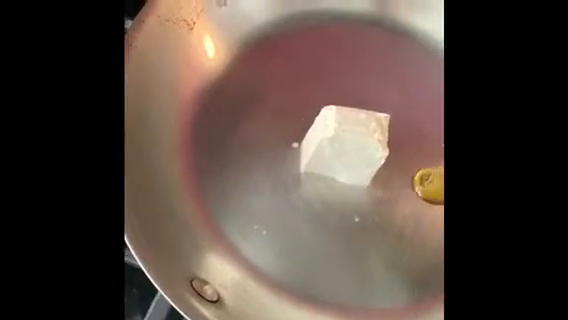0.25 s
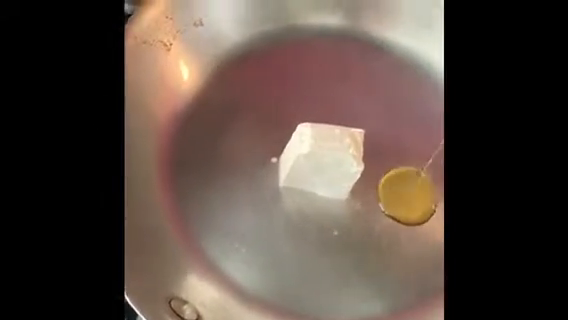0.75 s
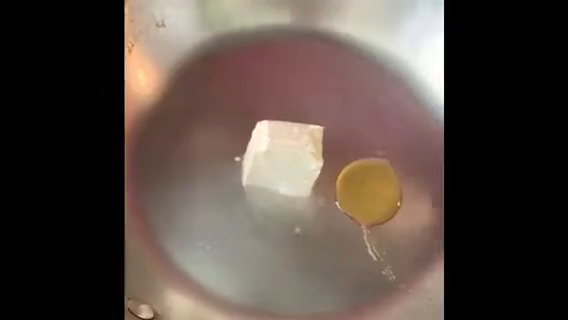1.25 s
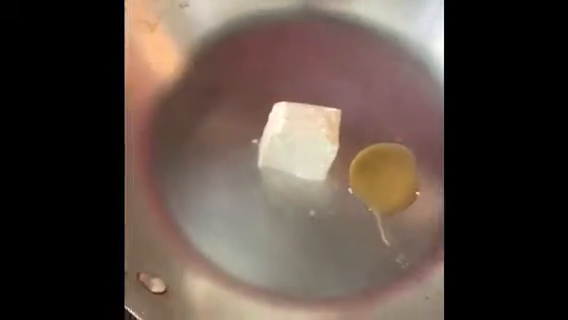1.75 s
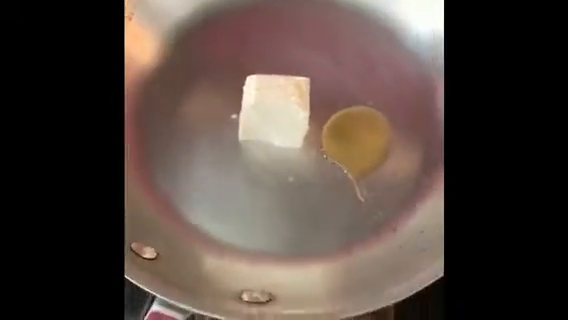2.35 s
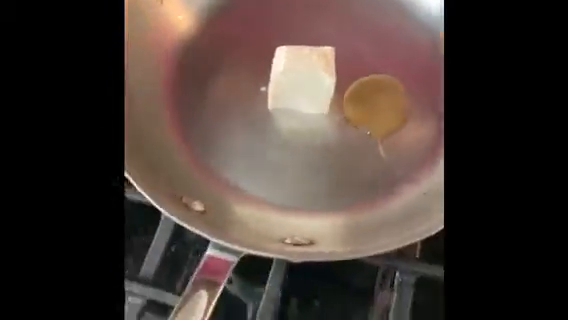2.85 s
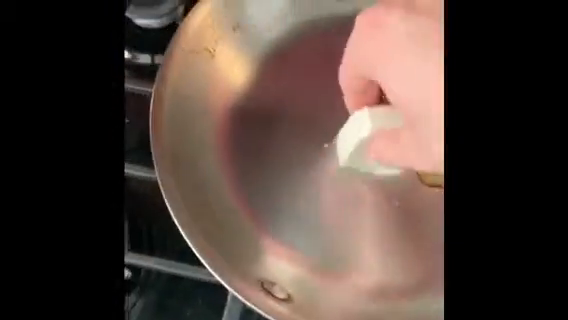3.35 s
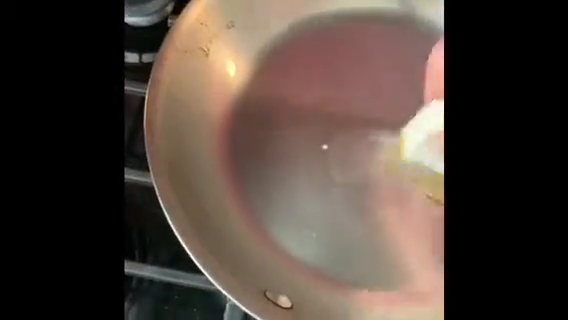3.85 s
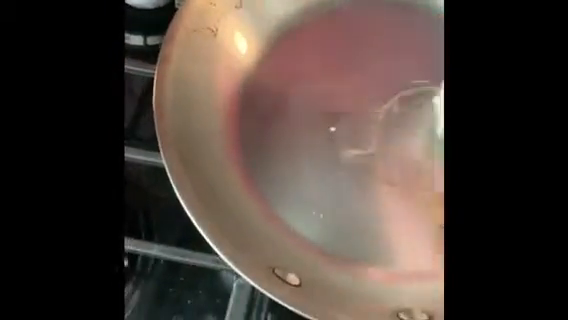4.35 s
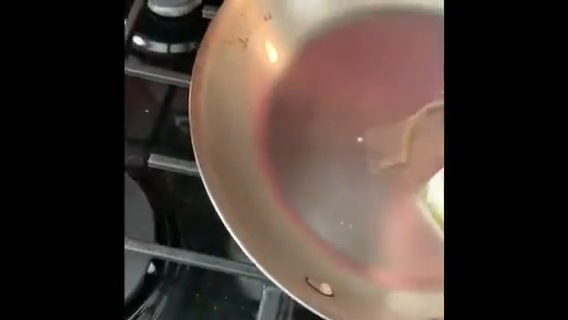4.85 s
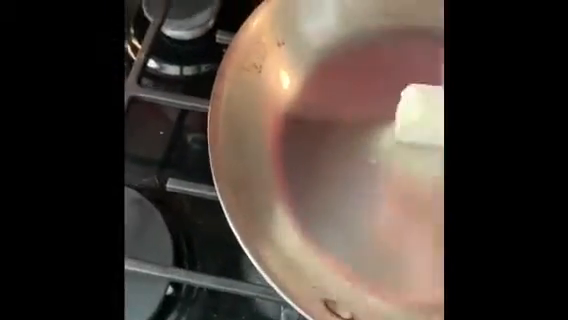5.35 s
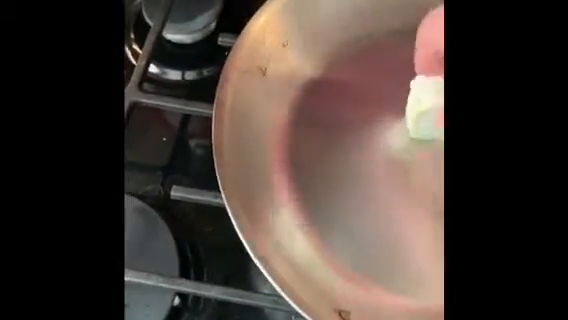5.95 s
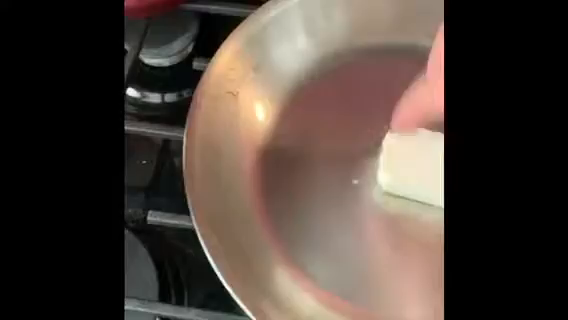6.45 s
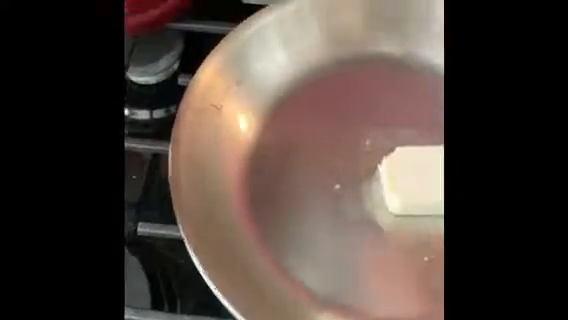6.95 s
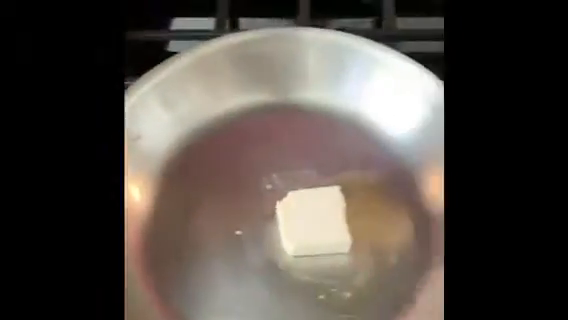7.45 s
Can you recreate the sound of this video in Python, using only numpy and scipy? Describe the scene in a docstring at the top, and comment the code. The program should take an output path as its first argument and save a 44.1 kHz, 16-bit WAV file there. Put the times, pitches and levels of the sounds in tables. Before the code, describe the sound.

A small hard-walled kitchen, heard closely in stereo. Throughout, a gas burner makes a quiet low rumble, airy hiss and thin wavering whines near 3, 5 and 7 kHz that slowly sag and fade. At 0.66 s an oil bottle gulps: a tiny pop and quick falling bubbles, then a very faint rising chirp. At 2.12 s the bottle lands on the counter, the loudest event: sharp woody knocks with a short high glass squeak, a second cluster at 2.26-2.31, and weak taps at 2.4 and 2.58. Soft hand rustles swell around 2.7-3.0. A tiny snap comes at 3.49. Dull pan-on-iron clacks at 3.82-3.95 precede a bright steel clink at 4.46, ringing briefly. Faint rocking follows at 4.65-5.02, small snaps near 5.2, then a fuller, quieter clink at 6.21 with clacks until 6.43. A faint rustle passes at 7.3; dry clicks and hollow bumps rush in from 7.58 to 7.7.

```python
"""A small kitchen: a gas burner rumbles, hisses and whines under a steel frying pan; hard walls echo the blows.
Noise shaped by the burner tube makes the hiss; slowly wavering narrow-band noise makes the whines.
An oil bottle gulps (falling tone bursts, rising chirp), then lands on the counter, squeaks and rings.
A hand rustles (noise swells) and butter snaps; the pan clinks and rocks on its grate; something heavy bumps.
Blows are decaying sines plus dense noise bursts and wavefronts, low-passed by the softness of the contact."""
import sys
import numpy as np
from scipy import signal
from scipy.fft import rfft, irfft, next_fast_len
from scipy.io import wavfile

SR = 44100
rng = np.random.default_rng(int(sys.argv[2]) if len(sys.argv) > 2 else 0)


def dump_mix(stems):
    """Bounce the given channels to the path in sys.argv[1] as a 16-bit WAV at rate SR."""
    frames = np.atleast_2d(stems).T  # one column per channel
    limited = np.clip(frames, -1, 1)  # hard clip at full scale
    pcm = np.round(limited * 32767).astype(np.int16)
    wavfile.write(sys.argv[1], SR, pcm)


N = 340055
T = np.arange(N) / SR
RING_T = T[:SR]
TOP_HZ = 15900  # upper band limit


def undb(db):
    """Decibels to amplitude ratio."""
    return 10 ** (np.asarray(db) / 20)


def at_hz(points, hz):
    """Read (hz, value) points on a log-frequency axis."""
    f, value = np.transpose(points)
    return np.interp(np.log(hz + 1), np.log(f), value)


def bins(size):
    """Frequencies of the real spectrum, in Hz."""
    return np.fft.rfftfreq(size, 1 / SR)


def colour(x, points):
    """Shape a spectrum by (hz, gain_db) points."""
    size = x.shape[-1]
    return irfft(rfft(x) * undb(at_hz(points, bins(size))), size)


def unit(x):
    """Scale to rms 1."""
    return x / np.sqrt(np.mean(x ** 2))


def unit_attack(x):
    """Scale to rms 1 over the first 20 ms."""
    return x / np.sqrt(np.mean(x[..., :SR // 50] ** 2))


def fade(t60_s):
    """Exponential decay by 60 dB in t60_s."""
    return np.exp(-np.log(1000) * RING_T / np.maximum(t60_s, 1e-3))


def envelope(start_s, attack_s, hold_s, t60_s):
    """Linear rise, hold, exponential decay."""
    age_s = T - start_s
    rise = np.clip(age_s / attack_s, 0, 1)
    decay_db = -60 * np.clip((age_s - attack_s - hold_s) / t60_s, 0, 3)
    return rise * undb(decay_db)


def tone(start_s, pitch_hz, rise_hz_per_s=0):
    """Sine whose pitch moves at a steady rate from pitch_hz at start_s."""
    age_s = T - start_s
    return np.sin(2 * np.pi * (pitch_hz + rise_hz_per_s * age_s / 2) * age_s)


def wander(per_s):
    """Slow chance: normal random values, per_s of them a second, joined by straight lines."""
    return np.interp(T * per_s, np.arange(SR), rng.standard_normal(SR))


# left-right correlation of diffuse sound: hz, correlation
DIFFUSE_CORRELATION = [(100, 0.94), (400, 0.84), (900, 0.31), (1600, 0.041), (5000, 0.088)]


def diffuse(size):
    """Stereo noise, alike in the bass and nearly unrelated in the treble."""
    likeness = np.clip(at_hz(DIFFUSE_CORRELATION, bins(size)), 0, 1)
    noise = rng.standard_normal((2, size))
    mid, side = rfft(noise) * np.sqrt([1 + likeness, 1 - likeness])
    return unit(irfft([mid + side, mid - side], size))


def convolve(x, response):
    """Filter by a response, cut to N samples."""
    return signal.fftconvolve(np.atleast_2d(x), np.atleast_2d(response), axes=-1)[:, :N]


def die_away(x, t60_points):
    """Let each frequency region fade at its own (hz, t60_s) rate."""
    spectrum, out = rfft(x), 0
    for band_hz, t60_s in t60_points:
        share = at_hz([(f, f == band_hz) for f, _ in t60_points], bins(SR))
        out = out + irfft(spectrum * share) * fade(t60_s)
    return out


def ring(modes, spread=0.65):
    """Decaying sines: neighbours in opposite phase, high modes out of step between the ears."""
    out = 0
    for k, (hz, db, t60_s) in enumerate(modes):
        skew = spread * rng.standard_normal() * min(hz / 1500, 2) * np.array([[1], [-1]])
        mode = np.sin(2 * np.pi * hz * RING_T + skew) * fade(t60_s)
        out = out + (-1) ** k * undb(db) * mode
    soft_onset = 1 - fade(0.0045)
    return unit_attack(out * soft_onset)


def crack(points, travel_ms=0):
    """Causal first wavefront; bending waves delay it by travel_ms at 1 kHz, treble less, bass more."""
    hz = bins(SR)
    # fold the cepstrum: minimum phase
    cepstrum = irfft(at_hz(points, hz) * np.log(10) / 20)
    cepstrum[1:SR // 2] *= 2
    cepstrum[SR // 2:] = 0
    bending_rad = 4 * np.pi * abs(travel_ms) * np.sqrt(hz / 1000)
    return unit_attack(irfft(np.exp(rfft(cepstrum) - 1j * bending_rad)) * fade(0.8))


# decay of small overtones: hz, t60_s
OVERTONE_DECAY = [(2500, 0.15), (6000, 0.18), (12000, 0.18)]


def body(points, t60_s, overtones_db=-6):
    """Countless small modes: a dense noise burst plus sparse random overtones that ring on."""
    hz = bins(SR)
    scattered = (rng.random(len(hz)) < 1 / 55) & (hz > 1100)
    overtones = die_away(unit(irfft(rfft(diffuse(SR)) * scattered)), OVERTONE_DECAY)
    burst = diffuse(SR) * fade(t60_s) + undb(overtones_db) * overtones
    return unit_attack(convolve(burst, crack(points))[:, :SR])


def strike(response, start_s, level_db, bright_hz):
    """One blow; two low-pass poles at bright_hz: a softer contact pushes longer, exciting less treble."""
    relax = np.exp(-2 * np.pi * bright_hz / SR)
    hit = signal.lfilter([(1 - relax) ** 2], [1, -2 * relax, relax ** 2], response) * undb(level_db)
    return np.pad(hit, ((0, 0), (int(start_s * SR), N)))[:, :N]


# contact to contact: mode level spread, pitch spread as a share
SPOT_SCATTER_DB, LOAD_DETUNE = 3.5, .002


def new_spot(modes, ring_share):
    """Each contact loads the board anew: modes change level, shift slightly, keep ring_share of t60."""
    chance = rng.standard_normal((len(modes), 2))
    return [(hz * (1 + LOAD_DETUNE * a), db + SPOT_SCATTER_DB * b, t60_s * ring_share)
            for (hz, db, t60_s), (a, b) in zip(modes, chance)]


def place(x, side):
    """Direction: a level difference between the ears, by frequency."""
    size = next_fast_len(N + SR, real=True)
    tilt = undb(at_hz(side, bins(size)) / 2)
    return irfft(rfft(x, size) * [tilt, 1 / tilt], size)[:, :N]


# wall reflections: hz, t60_s
KITCHEN_DECAY = [(100, 0.66), (500, 0.52), (1500, 0.51), (4000, 0.28), (8000, 0.57), (15000, 0.2)]


def kitchen(build_s):
    """Room response of unit energy: noise that builds up quickly, then decays by frequency."""
    tail = die_away(diffuse(SR), KITCHEN_DECAY) * (1 - np.exp(-(RING_T / build_s) ** 2))
    return unit(tail) / np.sqrt(SR)


# flame spectrum, relative: hz, level_db
FLAME_COLOUR = [(20, -10.5), (45, -6), (70, 2), (125, -3.5), (180, -8), (400, -14.5), (620, -12),
                (850, -18.5), (1100, -27.5), (1500, -38), (4000, -68.5)]
# gas hiss spectrum before the tube, relative: hz, level_db
JET_COLOUR = [(300, -5.5), (1400, -1.5), (2400, 6), (4000, -3.5), (6200, -5), (11000, 1.5), (15500, -1.5)]
# burner tube resonances: centre_hz, width_hz, gain_db
TUBE_MODES = [(3000, 990, 8.5), (5027, 820, 9), (7190, 480, 3), (11750, 1800, 4)]
# whines at time 0: pitch_hz, level_db
BURNER_WHINES = [(3060, -72.5), (5100, -82.5), (7300, -79.5)]
JET_DB, JET_WANDER_DB, JET_WANDER_PER_S = -72, 1.6, 1.5
WHINE_WIDTH_HZ, WHINE_WAVER_HZ, WHINE_SAG_HZ_PER_S, WHINE_FADE_DB_PER_S = 240, 50, 25, 0.97


def burner():
    """Low flame noise, gas hiss through a resonant tube, and thin wavering whines that sag and fade."""
    flame = unit(colour(diffuse(N), FLAME_COLOUR)) * undb(-59.0)
    hz = bins(N)
    tube_db = sum(db / (1 + (2 * (hz - f) / width_hz) ** 2) for f, width_hz, db in TUBE_MODES)
    jet = irfft(rfft(colour(diffuse(N), JET_COLOUR)) * undb(tube_db), N)
    out = flame + unit(jet) * undb(JET_DB + JET_WANDER_DB * wander(JET_WANDER_PER_S))
    flutter = unit(irfft(rfft(diffuse(N)) / (1 + (2 * hz / WHINE_WIDTH_HZ) ** 2), N))
    for start_hz, db in BURNER_WHINES:
        whine_hz = start_hz - WHINE_SAG_HZ_PER_S * T + WHINE_WAVER_HZ * wander(per_s=8.9)
        swell_db = db - WHINE_FADE_DB_PER_S * T + JET_WANDER_DB * wander(JET_WANDER_PER_S)
        carrier = np.sin(2 * np.pi * np.cumsum(whine_hz) / SR)
        own_flutter = np.roll(flutter, rng.integers(N), axis=1)
        out = out + own_flutter * carrier * undb(swell_db)
    return out


# sheet-metal stove top, relative: hz, level_db
STOVE_COLOUR = [(50, -0.5), (110, 4), (220, -12), (340, 2), (500, -29), (750, -0.5), (1200, -54)]
BOOM_RISE_S, BOOM_T60_S = 0.013, 1
BOOM_ROCK_DB, BOOM_CLINK_DB = 1.5, -22.5  # added to the level of the blow that shakes it


def stove_top():
    """Blows on the pan pass down through the grate; the sheet metal answers with a slow-rising low boom."""
    boom = unit(colour(diffuse(SR), STOVE_COLOUR))
    boom = boom * (1 - np.exp(-RING_T / BOOM_RISE_S)) * fade(BOOM_T60_S)
    rocked = sum(strike(boom, s, db + BOOM_ROCK_DB, hz) for s, db, hz in PAN_ROCKS)
    clinked = sum(strike(boom, s, db + BOOM_CLINK_DB, hz) for s, db, hz, _ in PAN_CLINKS)
    return rocked + clinked


# hand reaching in and drawing back: peak_s, level_db, rise_s
HAND_SWELLS = [(2.715, -57.5, 0.068), (2.839, -55.5, 0.036), (2.97, -55.5, 0.067), (7.32, -58, 0.15)]
# rustle spectrum, relative: hz, level_db
HAND_COLOUR = [(100, 8.5), (350, 15), (900, -2), (2400, 1), (3800, -8.5), (5200, -5.5), (8000, -21),
               (16000, -22)]
# butter snaps in the oil, then dry clicks: start_s, level_db, centre_hz
BUTTER_TICKS = [(3.487, -54.5, 7000), (5.212, -57, 13200), (5.2309, -51, 13100), (7.5787, -55, 3730),
                (7.604, -40.5, 2800), (7.609, -41, 2600)]
HAND_FALL_RATIO = 1.73  # fall time / rise time


def butter():
    """The hand's rustle, noise that swells and falls with each move, plus short band-noise ticks."""
    power = 0
    for s, db, rise_s in HAND_SWELLS:
        width_s = np.where(T < s, rise_s, rise_s * HAND_FALL_RATIO)
        power = power + (undb(db) * np.exp(-abs(T - s) / width_s)) ** 2
    out = unit(colour(diffuse(N), HAND_COLOUR)) * np.sqrt(power)
    for s, db, hz in BUTTER_TICKS:
        snap = colour(diffuse(SR), [(hz / 3, -20), (hz / 1.1, 0), (1.3 * hz, -2), (1.4 * hz, -24)])
        out = out + strike(unit(snap) * fade(0.035), s, db, TOP_HZ)
    return out


# something heavy shifted along the worktop: start_s, level_db, bright_hz
WORKTOP_BUMPS = [(7.581, -58, 902), (7.610, -51.5, 2500), (7.6238, -45.5, 683), (7.6525, -47, 2300),
                 (7.663, -42, 1810), (7.678, -42, 900), (7.686, -41.5, 1820), (7.6951, -39, 1500),
                 (7.704, -41.5, 900)]
# its main modes, t60 before ring_share: hz, level_db, t60_s
WORKTOP_BUMP_MODES = [(94, -4, 0.22), (224, -7, 0.26), (353, 0.5, 0.14), (682, 7.5, 0.2),
                      (1044, 12.5, 0.11), (1345, 5, 0.12), (1603, 7.5, 0.044), (2830, 0, .08),
                      (3530, -5, .09)]
# its dense modes and front: hz, level_db
WORKTOP_BUMP_BODY = [(100, 1), (480, 0), (700, 8), (1600, -0.5), (2800, -9), (4500, -24), (12000, -27)]


def bumps():
    """A quick run of hollow bumps: freshly scattered modes behind one shared sharp front."""
    front = body(WORKTOP_BUMP_BODY, t60_s=0.08) * undb(-6) + crack(WORKTOP_BUMP_BODY, travel_ms=0.8)
    out = 0
    for s, db, hz in WORKTOP_BUMPS:
        modes = ring(new_spot(WORKTOP_BUMP_MODES, ring_share=0.96), spread=1.0)
        out = out + strike(modes * undb(3.0) + front, s, db, hz)
    return out


# pan rocking on the grate: start_s, level_db, bright_hz
PAN_ROCKS = [(3.8492, -50.5, 4160), (3.893, -53, 3250), (3.953, -56.5, 2500), (4.652, -57, 1200),
             (4.816, -57.5, 1200), (4.958, -53.5, 4500), (5.018, -56.5, 1800), (6.302, -54, 3490),
             (6.367, -60, 2400), (6.432, -62, 1600)]
# iron bars, main modes: hz, level_db, t60_s
BAR_MODES = [(776, -0.5, 0.084), (920, -14.5, 0.53), (1422, 1, 0.058), (2040, -4, 0.093)]
# iron bars, dense modes and wavefront: hz, level_db
BAR_BODY = [(450, -17.5), (800, 1.5), (1500, -6), (2100, -10), (2700, -18.5), (4500, -25.5), (9000, -65)]
# direction of grate and pan: hz, left_minus_right_db
STOVE_DIRECTION = [(150, 4), (650, 8.5), (1600, 4.5), (3000, -0.5), (9000, 0.5)]


def grate():
    """Dull clacks of the pan's base on iron bars: few modes, a short rattle and a spread wavefront."""
    wavefront = crack(BAR_BODY, travel_ms=1.044) * undb(0.5)
    rattle = body(BAR_BODY, t60_s=.06, overtones_db=-12) * undb(-9)
    out = 0
    for s, db, hz in PAN_ROCKS:
        response = ring(BAR_MODES, spread=0.51) * undb(-2) + rattle + wavefront
        out = out + strike(response, s, db, hz)
    return place(out, STOVE_DIRECTION)


# taps on the pan: start_s, level_db, bright_hz, place (0 rim - 1 wall)
PAN_CLINKS = [(3.819, -49, 3520, 0.54), (4.463, -26.5, 14300, 0.17), (6.209, -40, 16200, 0.74)]
# steel pan, main modes, the two lowest being low booms of the grate and stove top: hz, rim_db, wall_db, t60_s
STEEL_MODES = [(42.7, -32, -7.5, 1.1), (149.4, -22, -32, 0.66), (940, 12, -4, 0.069), (940, -10, -18, 0.9),
               (943, -13, -24, 0.34), (1200, -16, -44, 0.7), (1500, 10, -1.5, 0.026),
               (1640, -26, -12, 0.38), (1707, -8, -40, 0.36), (1760, -7, -34, 0.33), (1895, -7, -36, 0.3),
               (2000, -9, -31, .33), (2735, -50, 6, 0.33), (3052, -40, 14, 0.15), (3250, -22, 12, 0.12),
               (3700, -9, 19, 0.03), (4215, 4, 0, 0.06), (5340, -18, -4, 0.08), (7900, -2, -11, 0.07)]
# steel pan, dense modes: hz, level_db
STEEL_BODY = [(100, -83), (500, -39), (900, 20.5), (1900, 16), (2400, 11), (4000, 15), (6200, 13),
              (8200, 12.5), (16000, 8)]
# instant of contact: hz, level_db
STEEL_CLICK = [(600, -29), (1100, -4.5), (3700, -4.5), (6000, -16), (8500, 8.5), (12500, 14.5), (16000, 2)]


def pan():
    """Hard taps on steel: a sharp click, a metallic wash, and modes weighted by where the tap lands."""
    out = 0
    for s, db, hz, wall in PAN_CLINKS:
        wash = body(STEEL_BODY, t60_s=0.084, overtones_db=-2)
        splash = wash * undb(-7.5) + crack(STEEL_CLICK, travel_ms=0.763) * undb(-7.0)
        modes = [(f, rim_db + wall * (wall_db - rim_db), t60_s)
                 for f, rim_db, wall_db, t60_s in STEEL_MODES]
        response = ring(modes, spread=0.47) * undb(2.5 - 6 * wall) + splash * undb(5.86 * wall)
        out = out + strike(response, s, db, hz)
    return place(out, STOVE_DIRECTION)


# bottle spout pop: hz, level_db, t60_s
POP_MODES = [(1200, -2.5, 0.088), (1735, 1.5, 0.079), (2500, -1.5, 0.095), (3150, 1, 0.037),
             (4360, -13.5, 0.084), (8670, -6.5, 0.043)]
GULP_S, GULP_HZ, GULP_DB = .659, 1690, -26.5  # first bubble
BUBBLE_GAP_S, BUBBLE_STEP_HZ, BUBBLE_STEP_DB = 0.011, -105, -6
BUBBLE_ATTACK_S, BUBBLE_HOLD_S, BUBBLE_T60_S = 0.0022, 0.002, 0.016
RUNBACK_S, RUNBACK_HZ, RUNBACK_RISE_HZ_PER_S, RUNBACK_DB = .695, 1710, 9400, -62
RUNBACK_ATTACK_S, RUNBACK_HOLD_S, RUNBACK_T60_S = .022, .042, .06


def spout(count=3):
    """Air gulped through the spout: a pop, bubbles falling in pitch, a faint rising chirp as oil runs back."""
    pop_body = body([(600, -14), (1500, 16.0), (4000, -4), (12000, -5)], t60_s=0.046)
    out = strike(ring(POP_MODES) + pop_body * undb(-5.0), GULP_S, level_db=-40.5, bright_hz=12000)
    for k in range(count):
        start_s = GULP_S + k * BUBBLE_GAP_S
        bubble = tone(start_s, GULP_HZ + k * BUBBLE_STEP_HZ)
        bubble = bubble * envelope(start_s, BUBBLE_ATTACK_S, BUBBLE_HOLD_S, BUBBLE_T60_S)
        out = out + bubble * undb(GULP_DB + k * BUBBLE_STEP_DB)
    chirp = tone(RUNBACK_S, RUNBACK_HZ, RUNBACK_RISE_HZ_PER_S)
    chirp = chirp * envelope(RUNBACK_S, RUNBACK_ATTACK_S, RUNBACK_HOLD_S, RUNBACK_T60_S)
    sputter = undb(3 * wander(per_s=260))
    return out + chirp * sputter * undb(RUNBACK_DB)


# two close glass modes left ringing: start_s, level_db, t60_s
BOTTLE_RINGS = [(2.135, -41, 0.6), (2.293, -34, .2)]
SKID_S, SKID_HZ, SKID_DB = 2.129, 3340, -23.5
GLASS_BEAT_HZ = 18


def glass():
    """The base squeaks as it skids; two close modes ring and beat, struck again as the bottle settles."""
    squeak = tone(SKID_S, SKID_HZ) * envelope(SKID_S, attack_s=0.0077, hold_s=0.013, t60_s=.045)
    out = squeak * undb(SKID_DB)
    for s, db, t60_s in BOTTLE_RINGS:
        pair = (tone(s, SKID_HZ) + tone(s, SKID_HZ + GLASS_BEAT_HZ)) / 2
        out = out + pair * envelope(s, attack_s=0.012, hold_s=0, t60_s=t60_s) * undb(db)
    return out


# blows on the counter: start_s, level_db, bright_hz, bass_db (low on an edge, high when flat)
COUNTER_KNOCKS = [(2.1232, -13, 1780, -3.5), (2.137, -22.5, 242, 4), (2.1504, -15, 2300, -6.5),
                  (2.177, -25, 220, 5.5), (2.261, -26.5, 1476, -6.5), (2.2675, -22.5, 898, -2),
                  (2.278, -17, 450, -1), (2.291, -13.5, 5070, -6.5), (2.312, -17.5, 260, -2),
                  (2.401, -33, 454, -6), (2.583, -41, 602, -3)]
# counter and bottle, t60 before ring_share: hz, level_db, t60_s
BOARD_MODES = [(69, -17, .35), (137.5, -1.5, .3), (181, -3.5, .26), (229.5, -3, .25), (266, -12, .25),
               (332, -3, .24), (397, -5.5, .19), (472, -18, .17), (618, -3, .15), (852, -4, .16),
               (884, -2, .2), (926, -7, .2), (1075, -3, .09), (1165, -1, .17), (1410, -13, .15),
               (1824, -4, .13), (2158, -6, .18), (2455, 1, .08), (2676, -8, .25), (3721, -17, .16),
               (4312, -12, .11), (5135, -16, .16)]
# their dense short-lived modes: hz, level_db
BOARD_BODY = [(100, -22), (500, -10), (1100, 5), (2400, 3), (3300, -3), (6500, -5.5), (8000, -3.5),
              (12000, -4.5), (16000, -5.5)]
# first bending wave of the worktop: hz, level_db
BOARD_THUD = [(50, -27.5), (130, -12), (350, 12.5), (900, 6.5), (1500, -2), (2500, -20.5), (5000, -35)]
# counter direction: hz, left_minus_right_db
COUNTER_DIRECTION = [(150, 1.5), (1000, 1), (1700, -0.5)]
EDGE_CRACK = .35  # dB more crack per dB less bass


def counter():
    """Worktop thuds, each with its own rattle: the bottle's edge cracks sharply, its flat base thumps."""
    wavefront = crack(BOARD_THUD, travel_ms=1.179) * undb(-7.0)
    out = 0
    for s, db, hz, bass_db in COUNTER_KNOCKS:
        rattle = body(BOARD_BODY, t60_s=0.07, overtones_db=-3) * undb(-6.5)
        front = wavefront * undb(-EDGE_CRACK * bass_db)
        modes = ring(new_spot(BOARD_MODES, ring_share=0.79), spread=0.8) * undb(-2.5)
        response = modes + front + rattle
        bass = signal.lfilter(*signal.butter(1, 350, fs=SR), response)
        out = out + strike(response + (undb(bass_db) - 1) * bass, s, db, hz)
    return place(out, COUNTER_DIRECTION)


def scene():
    """All sources directly, plus blows, squeak and gulp off the walls, which return less treble."""
    thuds, squeak, clinks, clacks, gulp = counter() + bumps(), glass(), pan(), grate(), spout()
    to_room = thuds * undb(-15.5) + squeak * undb(-26) + clinks * undb(-14.5)
    to_room = to_room + clacks * undb(-7.5) + gulp * undb(-25)
    to_room = colour(to_room, [(5000, 7.5), (8000, -13.5), (13000, -13.5)])
    echoes = convolve(to_room, kitchen(build_s=0.00053))
    direct = thuds + squeak + clinks + clacks + gulp
    return direct + stove_top() + butter() + burner() + echoes


# treble of the left channel taken from the right: hz, share
SHARED_TREBLE = [(5800, 0), (7200, 1)]
PORT_LAG_S = .000258


def record(dry):
    """Treble comes from one port (right), reaching the left channel slightly late; cuts above TOP_HZ."""
    size = next_fast_len(N + SR, real=True)
    hz = bins(size)
    left, right = rfft(dry, size)
    turn_rad = at_hz(SHARED_TREBLE, hz) * np.pi / 2
    late_right = right * np.exp(-2j * np.pi * hz * PORT_LAG_S)
    left = left * np.cos(turn_rad) + late_right * np.sin(turn_rad)
    top_cut = signal.ellip(8, .2, 70, TOP_HZ, fs=SR, output="sos")
    return signal.sosfilt(top_cut, irfft([left, right], size)[:, :N])


dry = scene()
out = record(dry)
dump_mix(out)
```